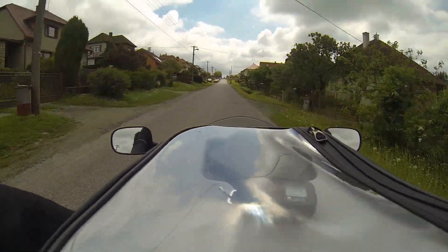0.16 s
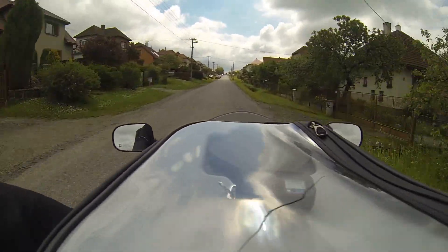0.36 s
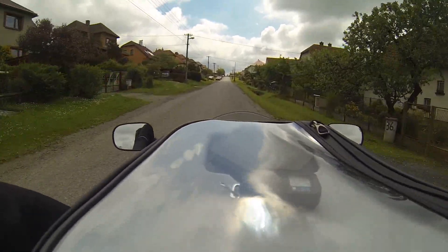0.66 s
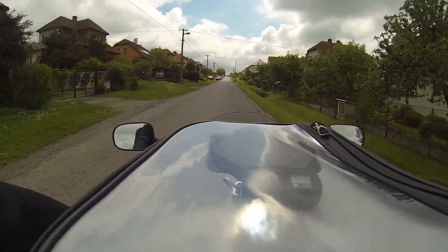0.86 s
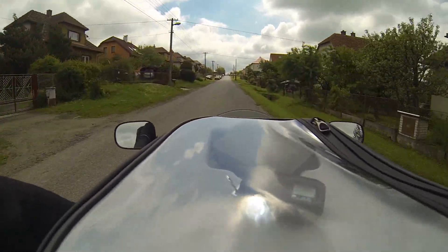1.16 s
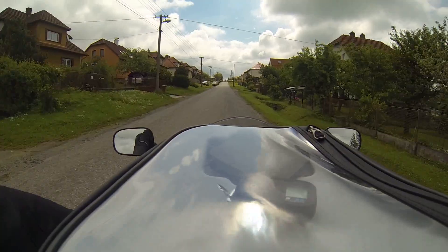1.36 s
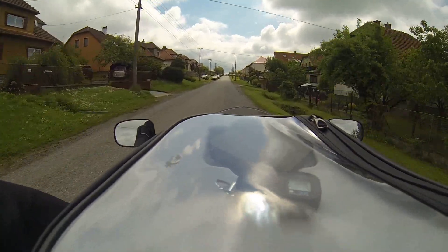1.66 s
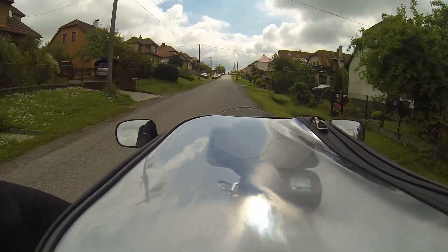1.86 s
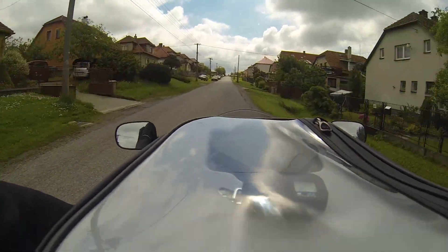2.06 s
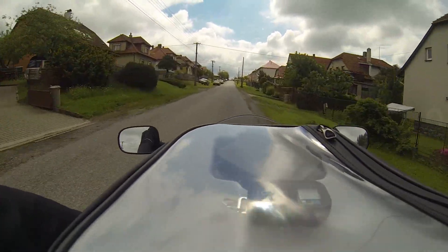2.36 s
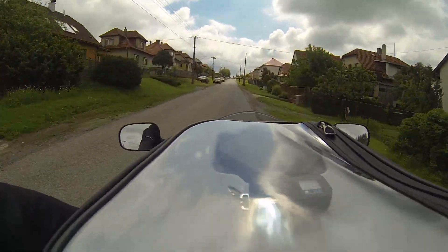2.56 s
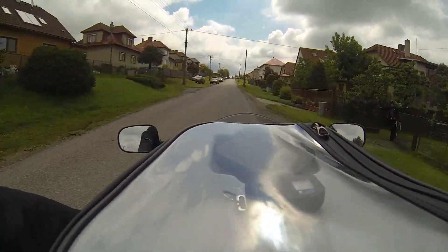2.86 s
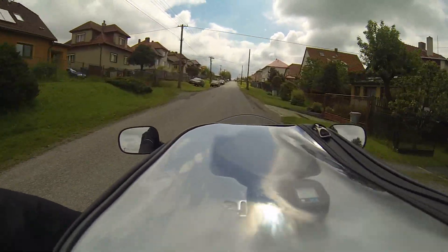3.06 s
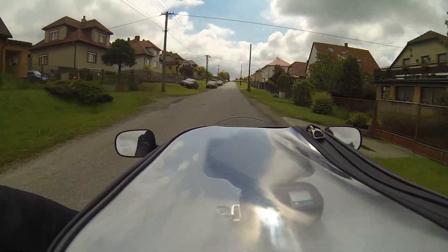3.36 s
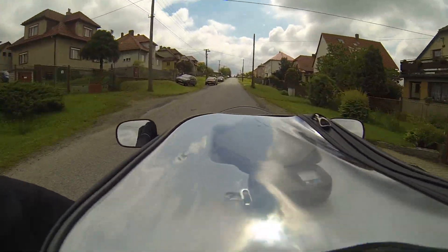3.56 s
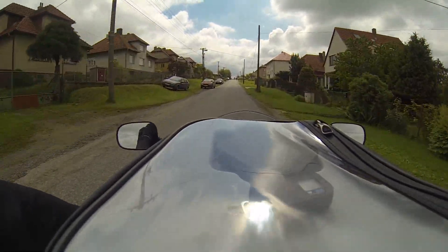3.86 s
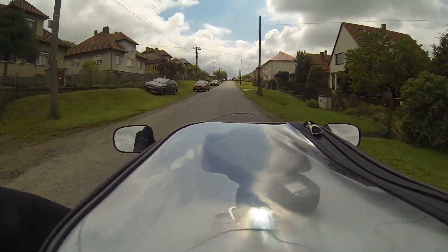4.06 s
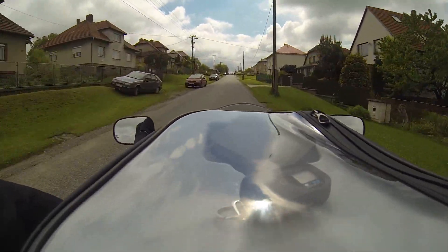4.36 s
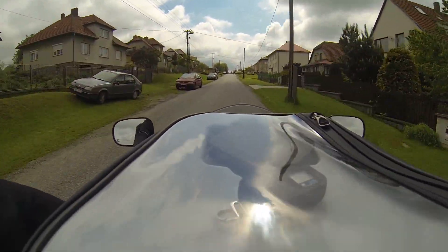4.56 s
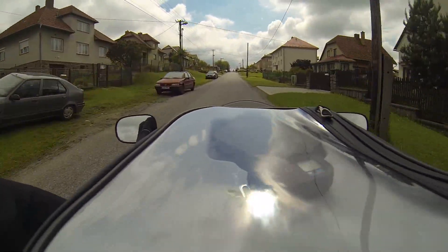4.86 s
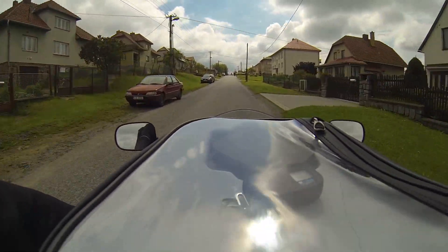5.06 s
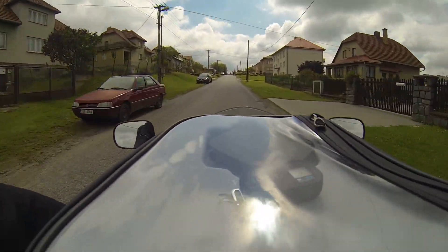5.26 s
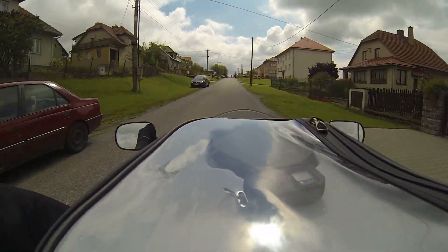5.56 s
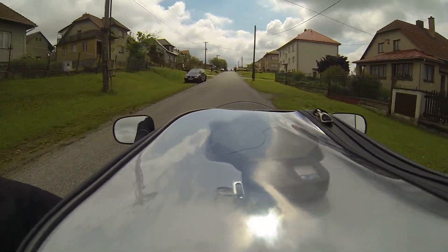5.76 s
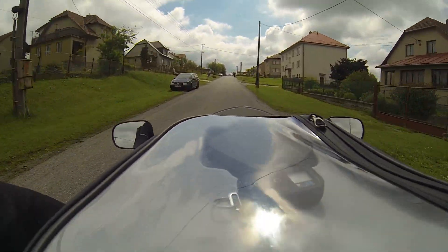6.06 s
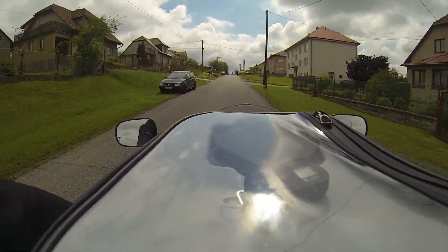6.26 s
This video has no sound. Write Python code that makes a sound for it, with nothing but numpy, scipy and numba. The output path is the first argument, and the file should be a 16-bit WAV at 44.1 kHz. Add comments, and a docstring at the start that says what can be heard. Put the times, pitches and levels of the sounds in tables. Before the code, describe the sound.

Low, fluttering wind roar and muffled hiss on a motorcycle ride, a dim engine drone beneath, broken by sharp bump knocks and brief volume dips.

```python
"""Wind buffets a closed camera housing on a motorcycle and hisses through its resonances: shaped noise bands.
Eddies throb low as a wavering tone; edges whistle and a whine drifts, both as narrow noise.
Road bumps knock the mount (ringing modes, noise bursts) and jolt the microphone; grit ticks as bright bursts.
The engine hums faintly underneath as a firing tone and its octave.
Loud peaks make the gain control duck; after a hold it creeps back."""
import sys
import numpy as np
from scipy import signal
from scipy.fft import rfft, irfft, next_fast_len
from scipy.io import wavfile
from scipy.ndimage import uniform_filter1d
from numba import njit

SR = 44100
rng = np.random.default_rng(int(sys.argv[2]) if len(sys.argv) > 2 else 0)


def to_wav(sig):
    """Store sig (one row per channel, or 1-D mono) as 16-bit WAV at the path in sys.argv[1].

    Samples outside -1..1 are clipped; the rate is SR.
    """
    pcm = np.clip(np.atleast_2d(sig), -1, 1) * 32767
    pcm = np.round(pcm).astype(np.int16)
    wavfile.write(sys.argv[1], SR, pcm.T)  # frames by channels


N = 282681
TIME_S = np.arange(N) / SR


def undb(db):
    """Amplitude factor of a level in dB."""
    return 10 ** (np.asarray(db) / 20)


def unit(x):
    """Scale to RMS 1."""
    return x / np.sqrt(np.mean(x ** 2))


def curves(table):
    """Columns of a time table, interpolated to one value per sample."""
    time_s, *columns = np.transpose(table)
    return [np.interp(TIME_S, time_s, column) for column in columns]


def walk(rate_hz):
    """Random levels held 1 / rate_hz seconds and smoothed twice; RMS 1."""
    hold = int(SR / rate_hz)
    steps = np.repeat(rng.standard_normal(N // hold + 1), hold)
    return unit(uniform_filter1d(uniform_filter1d(steps, hold), hold)[:N])


def band(x, lo_hz, hi_hz):
    """Butterworth bandpass."""
    return signal.sosfilt(signal.butter(2, [lo_hz, hi_hz], "bandpass", fs=SR, output="sos"), x)


def steep_band(x, lo_hz, hi_hz):
    """The same bandpass twice, for steeper skirts."""
    return band(band(x, lo_hz, hi_hz), lo_hz, hi_hz)


def burst(since_s, decay_s):
    """White noise that starts at since_s = 0 and decays exponentially."""
    envelope = (since_s >= 0) * np.exp(-np.maximum(since_s, 0) / decay_s)
    return rng.standard_normal(len(since_s)) * envelope


# Wind levels ahead of membrane and gain control.
# Each row: time in seconds, hiss in dB, rumble in dB, deep buffeting in dB.
GUSTS = [(0, -37.5, -34, -29), (.1, -35.5, -28.5, -15.5), (.3, -34.5, -28.5, -18), (.55, -33, -28.5, -17),
         (.8, -30, -21, -10.5), (.87, -32.5, -24.5, -16), (.905, -38, -27, -18), (.94, -35, -31, -22),
         (.965, -27.5, -23, -5), (1.0, -31.5, -23, -14.5), (1.3, -30, -25, -11), (1.65, -31, -24.5, -14.5),
         (1.85, -31.5, -28, -14), (2.1, -31.5, -25, -9.5), (2.5, -30.5, -25.5, -13),
         (2.85, -30.5, -23.5, -11.5), (3.1, -33, -27, -13.5), (3.35, -31.5, -26, -17.5),
         (3.7, -30, -24.5, -13), (3.85, -32, -26.5, -13.5), (4.15, -29, -22, -12.5), (4.65, -28, -23, -12),
         (4.8, -32, -25.5, -9), (5.1, -32.5, -27.5, -17), (5.4, -33, -28.5, -12.5),
         (5.85, -32, -27.5, -15.5), (5.97, -30.5, -24.5, -8.5), (6.15, -30.5, -23.5, -9),
         (6.41, -31, -26, -10)]
# Wind colour inside the housing. Each row: frequency in Hz, relative density in dB per Hz.
WIND_COLOUR = [(10, 7), (40, -7), (70, -15), (150, -19), (260, -28.5), (520, -40.5), (1050, -42.5),
               (2100, -45.5), (3000, -51), (4300, -61.5), (6000, -66.5), (9000, -74), (13500, -82),
               (15300, -103)]
# Housing resonances that lift the hiss. Each row: frequency in Hz, width in Hz, lift in dB.
HOUSING_MODES = [(403, 69, 4.5), (644, 46, 5), (903, 45, 4.5), (1256, 76, 5), (1366, 98, 4.5),
                 (1425, 530, 9.5), (1504, 106, 3.5), (2465, 300, 4.5), (3400, 153, 8), (3804, 335, 7.5),
                 (4990, 740, 6), (6750, 340, 4.5), (7950, 780, 5)]
# uneven surges of the buffeting, partly felt in the rumble
SURGE_DB, SURGES_PER_S, RUMBLE_SHARE = 2, 8.5, 0.26


def wind():
    """Turbulence in third-octave bands: shared puffs, plus a flicker of each band's own."""
    size = next_fast_len(N)
    hz = np.maximum(np.arange(size // 2 + 1) * SR / size, 1.)
    colour_hz, colour_db = np.transpose(WIND_COLOUR)
    db = np.interp(np.log(hz), np.log(colour_hz), colour_db)
    for mode_hz, width_hz, lift_db in HOUSING_MODES:
        db = db + lift_db * np.exp(-2 * ((hz - mode_hz) / width_hz) ** 2)
    noise = rfft(rng.standard_normal(size)) * undb(db) * np.minimum(hz / 8, 1)

    puff, crackle, buffet = walk(24), walk(120), walk(32)
    groups = np.zeros((3, N))  # buffeting, rumble, hiss
    for k in range(33):
        centre_hz = 10 * 2 ** (k / 3)
        window = np.cos(np.pi / 2 * np.clip(3 * np.log2(hz / centre_hz), -1, 1)) ** 2
        treble = np.clip(np.log2(centre_hz / 500) / 4, 0, 1)
        bass = np.clip(np.log2(700 / centre_hz) / 2, 0, 1)  # low bands arrive in shared lumps
        flicker_db = 0.2 * puff + 0.44 * treble * crackle + 1.73 * bass * buffet + 0.78 * walk(14)
        group = int(centre_hz > 90) + int(centre_hz > 500)
        groups[group] += irfft(noise * window, size)[:N] * undb(flicker_db)

    hiss_db, rumble_db, buffet_db = curves(GUSTS)
    surge_db = SURGE_DB * walk(SURGES_PER_S)
    levels_db = buffet_db + surge_db, rumble_db + RUMBLE_SHARE * surge_db, hiss_db
    return sum(unit(group) * undb(level_db) for group, level_db in zip(groups, levels_db))


# Eddies shed by the windscreen. Each row: time in seconds, pitch in Hz, level in dB.
EDDY_THROB = [(0, 40.1, -25.5), (1.7, 27.66, -25), (2.1, 31.06, -22.5), (2.9, 35.73, -20),
              (3.4, 39.32, -20), (4.2, 42.1, -18), (4.5, 42, -28), (6.41, 40.43, -34.5)]


def eddies():
    """Low lopsided throb: a tone and its octave, wavering in pitch, beats of uneven size."""
    hz, db = curves(EDDY_THROB)
    phase = 2 * np.pi * np.cumsum(hz * (1 + 0.0798 * walk(9.5))) / SR
    throb = np.sin(phase) - 0.26 * np.cos(2 * phase)
    return np.sqrt(2) * undb(db + 3.2 * walk(26)) * throb


# drift is the RMS share of the pitch
WHINE_HZ, WHINE_WIDTH_HZ, WHINE_DRIFT, WHINE_UNDER_HISS_DB = 1375, 37, .02, 12


def whine():
    """Slow noise on a wandering carrier inside the main housing resonance, rising with the hiss."""
    slow = signal.butter(2, WHINE_WIDTH_HZ / 2, fs=SR, output="sos")
    a, b = signal.sosfilt(slow, rng.standard_normal((2, N)))
    phase = 2 * np.pi * np.cumsum(WHINE_HZ * (1 + WHINE_DRIFT * walk(7.5))) / SR
    hiss_db = curves(GUSTS)[0]
    db = hiss_db - WHINE_UNDER_HISS_DB + 2.16 * walk(6.5)
    return undb(db) * unit(a * np.cos(phase) + b * np.sin(phase))


# Air whistling over the housing's edges.
# Each row: middle in seconds, length in seconds, frequency in Hz, width in Hz, level in dB.
EDGE_WHISTLES = [(0.773, 0.095, 1380, 140, -30.5), (1.99, 2.7, 5360, 201, -60), (4.15, 1.03, 666, 260, -43),
                 (2.454, .12, 1000, 200, -38.5), (3.979, 0.056, 1650, 120, -32.5),
                 (4.012, 0.055, 1835, 221, -31.5), (4.409, 0.023, 1378, 120, -23),
                 (4.454, 0.033, 1360, 120, -24), (6.299, 0.27, 5200, 250, -56)]


def whistles():
    """Narrow bands of noise that fade in and out."""
    air = rng.standard_normal(N)
    out = np.zeros(N)
    for middle_s, length_s, hz, width_hz, db in EDGE_WHISTLES:
        fade = np.exp(-2 * ((TIME_S - middle_s) / (length_s / 2)) ** 4)
        out += undb(db) * fade * unit(band(air, hz - width_hz / 2, hz + width_hz / 2))
    return out


# Road bumps. Each row: start in seconds, knock in dB, knock brightness in dB per octave, rebound in dB,
# jolt in dB, jolt frequency in Hz, jolt peak in ms after the knock, jolt spread in ms.
ROAD_BUMPS = [(0.875, -15, 13, -13.5, 12.5, 47.5, 15.2, 5.2), (2.9136, -26, 12, -16, 5, 45, 18, 7),
              (4.725, -19, 8.5, -10, 8, 43.3, 17.5, 3.7), (5.92, -4, 3, -16, 7.5, 46.2, 22.2, 7.5),
              (6.0937, -11.5, 11, -24, 2, 50.3, 16.5, 5.5)]
# Ringing modes of the mount. Each row: frequency in Hz, relative level in dB, decay by 60 dB in seconds.
MOUNT_MODES = [(975, -5.5, 0.033), (1245, 4.5, 0.013), (1467, -0.5, 0.011), (2010, -2.5, 0.01),
               (2222, -3, 0.013), (2580, -13.5, 0.021), (3840, -27, .012), (4950, -30.5, 0.011),
               (6660, -40, 0.0055)]


def mount_ring(t, tilt_db):
    """Decaying modes of the struck mount, tilted about 2 kHz; peak 1."""
    ring = np.zeros(len(t))
    for hz, db, t60_s in MOUNT_MODES:
        tone = np.sin(2 * np.pi * hz * t * rng.uniform(0.97, 1.03))
        ring += undb(db + tilt_db * np.log2(hz / 2000)) * tone * np.exp(-np.log(1000) * t / t60_s)
    ring *= 1 - np.exp(-t / 0.0013)  # soft onset
    return ring / np.abs(ring).max()


def camera_rebound(late_s):
    """Dull, rough thud of the camera slamming back, with a click and a short rattle of the mount."""
    thud = burst(late_s, 0.0067)
    body = 3 * steep_band(thud, 120, 1200) + 0.23 * steep_band(thud, 500, 4500)
    click = 0.17 * steep_band(burst(late_s, 0.002), 1500, 5000)
    rattle = 1.26 * steep_band(burst(late_s, 0.015), 880, 1350)
    return body + click + rattle


def bumps():
    """Each bump cracks and rings the mount, then swings the membrane slowly; the swing swells and dies."""
    out, t = np.zeros(N), TIME_S[:int(.12 * SR)]
    for s, knock_db, tilt_db, rebound_db, jolt_db, jolt_hz, swell_ms, spread_ms in ROAD_BUMPS:
        crack = 0.71 * steep_band(burst(t, 0.0027), 630, 2770)
        snap = undb(1.8 * tilt_db - 34) * steep_band(burst(t, 0.0017), 2200, 6000)
        knock = mount_ring(t, tilt_db) + crack + snap
        swell = np.exp(-.5 * ((1000 * t - swell_ms) / spread_ms) ** 2)
        jolt = -np.sin(2 * np.pi * jolt_hz * t) * swell
        rebound = camera_rebound(t - swell_ms / 1000)  # at the top of the swing
        i = int(s * SR)
        out[i:i + len(t)] += undb(knock_db) * knock + undb(rebound_db) * rebound + undb(jolt_db) * jolt
    return out


# Ticks of grit or a loose part. Each row: start in seconds, burst level before the bandpass in dB.
LISTED_TICKS = [(.1087, -54), (.5621, -47), (.8589, -40), (1.8033, -44), (2.4758, -41), (4.5047, -46),
                (5.16, -47), (5.783, -47), (6.0057, -43), (6.3938, -42), (1.3583, -41), (2.182, -41),
                (4.6392, -41.5), (6.028, -35), (6.2383, -43)]
GRIT_PER_S, GRIT_DB, GRIT_SCATTER_DB = 30, -57.5, 12.5


def ticks():
    """Millisecond bursts of bright noise: the listed ones over a faint random patter."""
    out, t = np.zeros(N), TIME_S[:int(.01 * SR)]
    chance = rng.random((int(GRIT_PER_S * N / SR), 2))
    patter = [(place * (TIME_S[-1] - .02), GRIT_DB + GRIT_SCATTER_DB * u ** 2) for place, u in chance]
    for s, db in list(LISTED_TICKS) + patter:
        i = int(s * SR)
        out[i:i + len(t)] += undb(db) * burst(t, 0.0026)
    return steep_band(out, 5000, 10700)


# Engine hum. Each row: time in seconds, firing rate in Hz, firing tone in dB, its octave in dB.
ENGINE_HUM = [(0, 157.6, -36, -45), (.8, 154, -38, -43), (1.4, 147.3, -49, -40.5), (2.1, 148.2, -33, -41),
              (2.82, 151.8, -34.5, -40.5), (3.1, 155.1, -35.5, -43.5), (3.7, 158.5, -36, -39.5),
              (4.2, 160, -34, -41), (4.66, 157.2, -61, -41.5), (5.3, 152.4, -53, -47.5),
              (6, 146.9, -33, -44.5), (6.41, 147.1, -40, -40)]


def engine():
    """Only the firing tone and its octave pass the housing, each a little unsteady."""
    hz, tone_db, octave_db = curves(ENGINE_HUM)
    phase = 2 * np.pi * np.cumsum(hz * (1 + 0.004 * walk(12))) / SR
    tone = undb(tone_db + 1.9 * walk(14)) * np.sin(phase)
    octave = undb(octave_db + 1.14 * walk(11)) * np.sin(2 * phase)
    return np.sqrt(2) * (tone + octave)


def membrane(x, limit=1.1):
    """The microphone membrane stiffens under the largest gusts: tanh saturation."""
    return limit * np.tanh(x / limit)


def scene():
    """Wind, whine and eddies share the membrane's saturation; the other layers add to it."""
    throb = membrane(wind() + whine() + eddies())
    return (throb + whistles() + engine() + bumps() + ticks())[None]


@njit
def gain_control(x, top, attack, hold, release, ahead):
    """A coming peak over the top pulls the gain down fast; after a hold it climbs at a steady dB rate."""
    y, peak, wait = np.empty(len(x)), top, 0.
    for i in range(len(x)):
        coming = max(abs(x[i]), abs(x[min(i + ahead, len(x) - 1)]))
        if coming > peak:
            peak += (coming - peak) * attack
            wait = hold
        elif wait > 0:
            wait -= 1
        else:
            peak = max(top, peak * release)
        y[i] = x[i] * top / peak
    return y


GAIN_TOP, ATTACK_S, AHEAD_S = .93, .0012, .003
HOLD_S, RELEASE_DB_PER_S = 0.11, 14
TOP_HZ = 15300


def record(dry):
    """Gain control, rounding at full scale, and a steep treble cut."""
    release = float(undb(-RELEASE_DB_PER_S / SR))
    held = gain_control(dry[0], GAIN_TOP, 1 / (ATTACK_S * SR), HOLD_S * SR, release, int(AHEAD_S * SR))
    rounded = held / (1 + held ** 20) ** (1 / 20)
    return signal.sosfilt(signal.ellip(10, .2, 90, TOP_HZ, fs=SR, output="sos"), rounded)[None]


dry = scene()
out = record(dry)
to_wav(out)
```